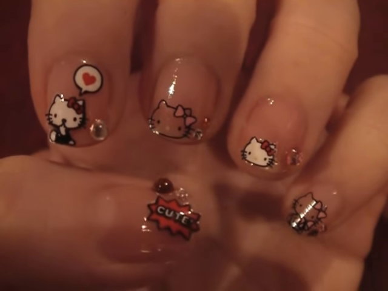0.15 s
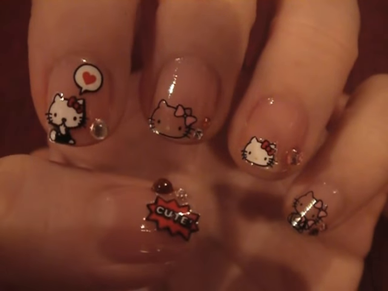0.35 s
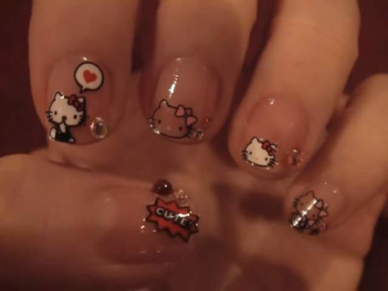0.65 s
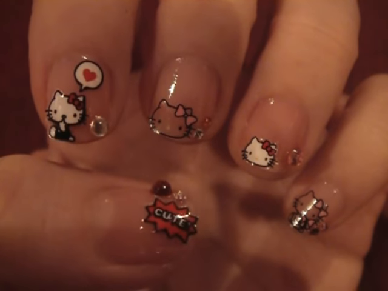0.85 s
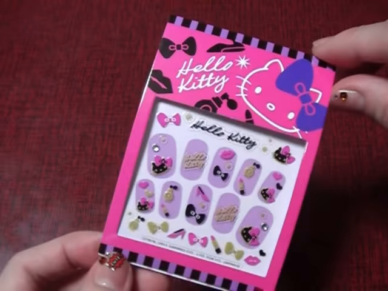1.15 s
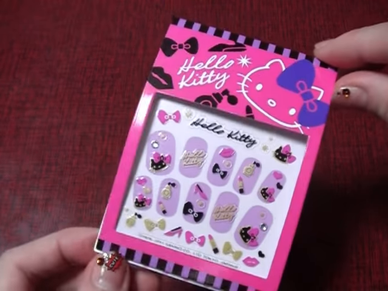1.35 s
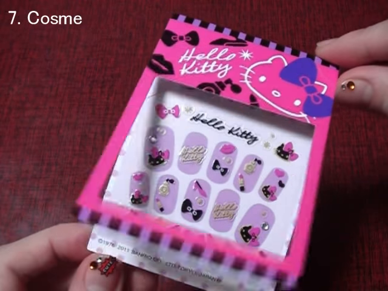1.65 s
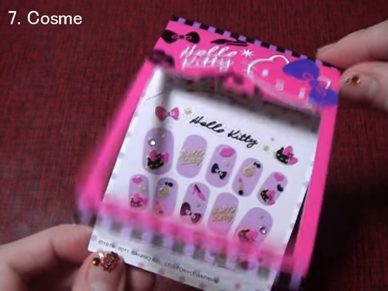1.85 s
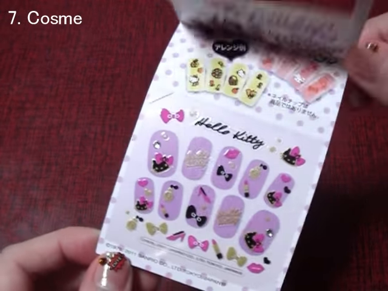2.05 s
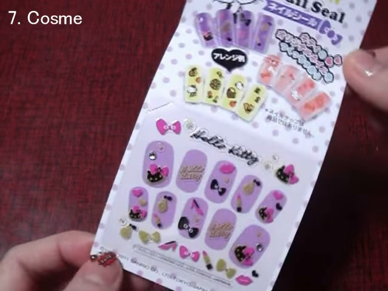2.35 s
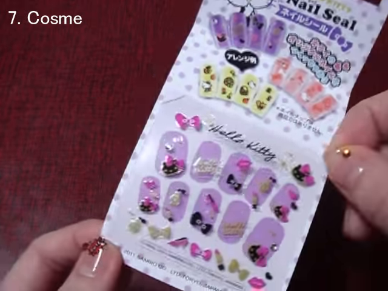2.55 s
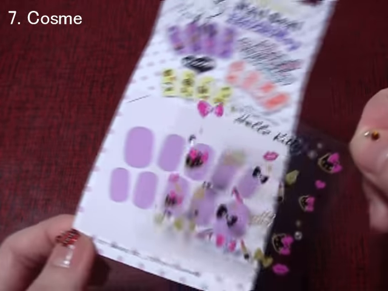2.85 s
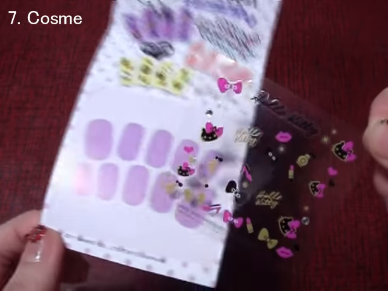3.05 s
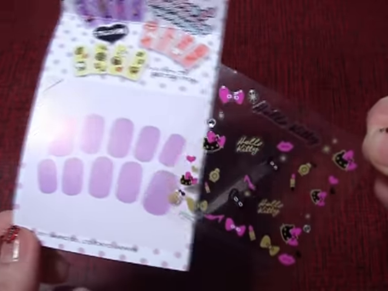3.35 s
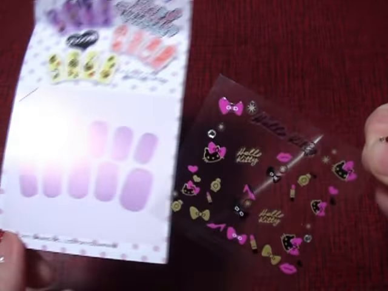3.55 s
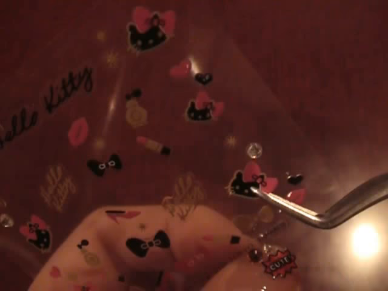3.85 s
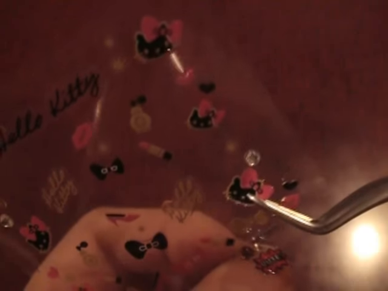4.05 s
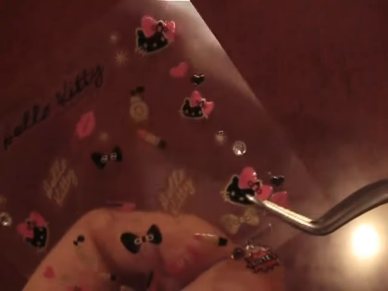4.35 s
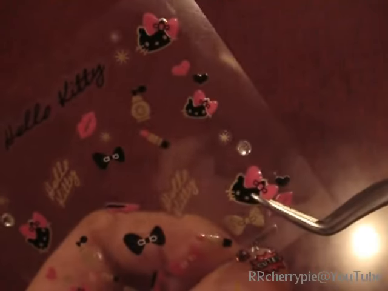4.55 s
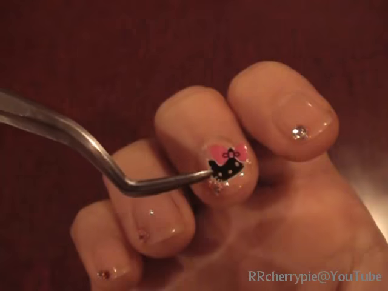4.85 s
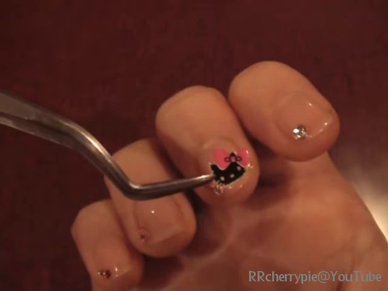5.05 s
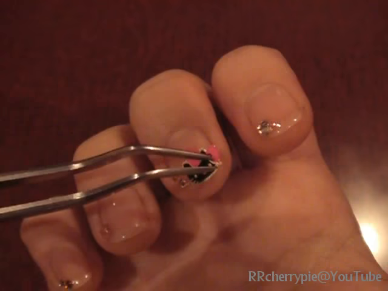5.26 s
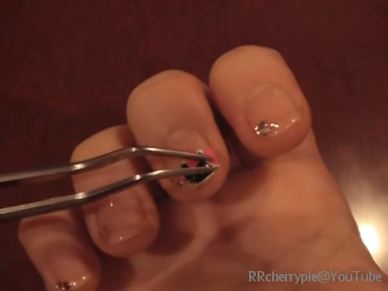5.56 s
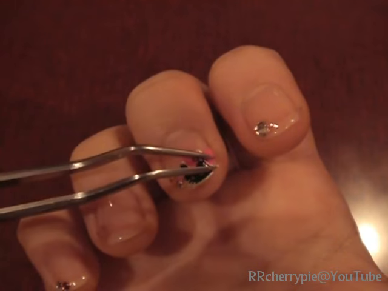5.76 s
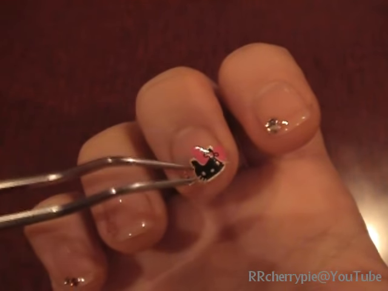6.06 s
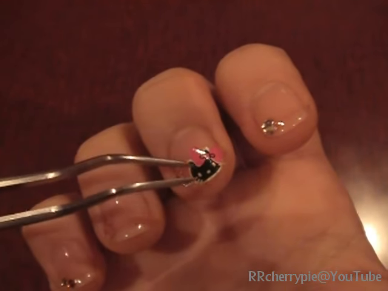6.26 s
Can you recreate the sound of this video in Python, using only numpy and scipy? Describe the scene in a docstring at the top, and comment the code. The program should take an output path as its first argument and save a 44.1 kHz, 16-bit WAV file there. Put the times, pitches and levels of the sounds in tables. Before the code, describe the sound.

A quiet small room, heard very close: soft hiss, a thin steady mid-pitched whine and a faint fluttering hum until a tiny dropout at 1.14 s. A slight motor whirr then runs until about 2.55 s. A small tick at 1.25 s; at 1.63 s a short bright scrape of a card flap, with crisp ticks and a soft knock through 1.76 s. After another dropout, a sharp tick at 2.78 s begins the pull of a plastic sheet; it slides with a crackly, hissy rustle around 3.0 s, then lighter rubs and brushes at 3.3 to 3.7 s. A faint tick at 3.78 s, a gap, quiet hum. Two ticks at 4.39 and 4.43 s lead straight into a very loud, dry, springy plastic snap at 4.44 s, dying quickly in the room. Low soft handling rumble near 4.9 to 5.2 s, faint brushes at 5.04 and 5.6 s, then only room noise and whine to the end at about 6.4 s.

```python
"""A quiet room, close to a small camera: a card packet is opened and a plastic sticker sheet slides out.
Stick-slip friction excites the resonances of card and film; small buckles crack and ring as ticks.
The taut sheet slips off a tweezer tip: its modes ring with a burst of cracks, and the room answers.
Sine whine, filtered-noise whirr and hum, and room noise lie beneath; five brief gaps are nearly silent."""
import sys
import numpy as np
from scipy import signal
from scipy.fft import rfft, irfft
from scipy.io import wavfile
from scipy.ndimage import uniform_filter1d

SR = 44100
rng = np.random.default_rng(int(sys.argv[2]) if len(sys.argv) > 2 else 0)


def wav_out(sig):
    """Save sig, one row per channel (or a flat mono array), as 16-bit PCM at SR to the path in sys.argv[1]."""
    wavfile.write(sys.argv[1], SR, np.round(np.clip(np.atleast_2d(sig).T, -1, 1) * 32767).astype(np.int16))


N = 283122
TIME = np.arange(N) / SR

# resonances of the film sliding over card: centre_hz, width_hz, gain_db
SLIDE_MODES = [(590, 160, 5), (870, 340, 10), (1270, 140, 9.4), (1620, 130, 7.3), (2320, 83, 2),
               (2700, 150, 4.5), (3470, 580, 6.2), (4700, 170, 6), (5420, 570, 3.9), (7400, 1400, 1),
               (7900, 560, 1.4), (9300, 930, 0.94)]


def from_db(db):
    """Amplitude gain is ten to the power of decibels over twenty."""
    return 10 ** (np.asarray(db) / 20)


def rms_one(x):
    """Division by the root mean square gives unit power."""
    return x / np.sqrt(np.mean(x ** 2) + 1e-20)


def at_hz(points, hz, axis=1):
    """Spectral interpolation: one table column is read on a log-frequency axis."""
    table = np.array(points)
    return np.interp(np.log(hz + 1e-9), np.log(table[:, 0]), table[:, axis])


def band(x, low_hz, high_hz, order=2):
    """A causal Butterworth band-pass, maximally flat between its edges."""
    edges_hz = [low_hz, min(high_hz, SR * .45)]
    sections = signal.butter(order, edges_hz, "band", fs=SR, output="sos")
    return signal.sosfilt(sections, x + 1e-18)


def clicks(rows):
    """Impulsive excitation: one single-sample impulse for each row of start_s, level_db."""
    out = np.zeros(N)
    for start_s, level_db in rows:
        out[round(start_s * SR)] += from_db(level_db)
    return out


def drift(per_s):
    """A slow random wander: straight lines join normal draws of unit spread."""
    steps = rng.standard_normal(4000)
    return np.interp(TIME * per_s, np.arange(len(steps)), steps)


def swell(start_s, attack_s, hold_s, release_s):
    """A hand movement: strength rises to start_s, holds, then falls; slopes are in seconds per 20 dB."""
    early = np.maximum(start_s - TIME, 0) / attack_s
    late = np.maximum(TIME - start_s - hold_s, 0) / release_s
    return from_db(-20 * np.minimum(early + late, 10))


def ring(x, hz, t60_s):
    """Damped oscillation: a unit impulse starts a decaying sine of initial height 1."""
    radius = 1000 ** (-1 / (t60_s * SR))
    angle = 2 * np.pi * hz / SR
    poles = [1, -2 * radius * np.cos(angle), radius * radius]
    return signal.lfilter([0, np.sin(angle)], poles, x + 1e-18)


def strike(x, modes):
    """Modal superposition: all modes of a body ring together, neighbours in opposite senses."""
    out = 0
    for k, (hz, gain_db, t60_s) in enumerate(modes):
        out = out + (-1) ** k * from_db(gain_db) * ring(x, hz, t60_s)
    return out


def resonate(x, modes):
    """Forced resonance: parallel two-pole filters of unit peak, each scaled by its own gain."""
    out = 0
    for k, (hz, width_hz, gain_db) in enumerate(modes):
        radius = np.exp(-np.pi * width_hz / SR)
        poles = [1, -2 * radius * np.cos(2 * np.pi * hz / SR), radius * radius]
        unit_peak = (1 - radius * radius) / 2
        out = out + (-1) ** k * from_db(gain_db) * unit_peak * signal.lfilter([1, 0, -1], poles, x)
    return out


def air():
    """Diffuse-field noise, partly alike at both microphones, with the rumble of shifting hands."""
    # noise spectrum: hz, shape_db
    floor_shape = [(20, -10.5), (60, -0.5), (130, -1.5), (340, -3), (440, 0), (520, -5), (760, -4.5),
                   (900, 0), (1150, -8), (2000, -11), (5000, -15.5), (10500, -22), (12000, -28),
                   (12900, -53.5)]
    # left-right likeness of the noise: hz, correlation
    likeness = [(50, 0.37), (130, 0.18), (300, 0.15), (700, 0.22), (1500, 0.083), (4000, 0.11),
                (12000, 0.057)]
    # hands shifting near the camera: start_s, hold_s, level_db
    handling = [(1.25, 1.0, -76.5), (2.63, 0.3, -70), (4.89, .32, -64)]
    hz = np.arange(N // 2 + 1) * SR / N
    alike = np.clip(at_hz(likeness, hz), 0, 1)
    mid, side = rfft(rng.standard_normal((2, N))) * from_db(at_hz(floor_shape, hz))
    spectra = np.sqrt(1 + alike) * mid + np.sqrt(1 - alike) * side * [[1], [-1]]
    hiss = from_db(-61.0) * rms_one(irfft(spectra, N))
    moving = 0
    for start_s, hold_s, level_db in handling:
        moving = moving + from_db(level_db) * swell(start_s, .13, hold_s, 0.501)
    lumps = from_db(3.0 * drift(25))  # uneven rumble
    return hiss + moving * rms_one(lumps * band(rng.standard_normal(N), 105, 260))


def whine():
    """Additive synthesis: steady sines of random phase form the camera whine."""
    # camera whine: line_hz, level_db (rms)
    lines = [(120, -84.5), (420, -80), (603.5, -78.5), (840.5, -66), (1681, -86), (4237, -89.5),
             (10088, -96)]
    out = 0
    for line_hz, level_db in lines:
        sine = np.sin(2 * np.pi * (line_hz * TIME + rng.random()))
        out = out + np.sqrt(2) * from_db(level_db) * sine
    return out


def whirr():
    """Resonant filtering: white noise through narrow resonances gives a faint motor whirr."""
    # motor whirr resonances: centre_hz, width_hz, gain_db
    motor_modes = [(1965, 89, 0), (2270, 40, -4), (2850, 114, -1.5), (3900, 78, -7), (4230, 110, -7.5),
                   (5200, 85, -7.5), (5940, 110, -6)]
    # time during which the whirr sounds: start_s, end_s
    start_s, end_s = (1.15, 2.55)
    running = (TIME > start_s) & (TIME < end_s)
    return from_db(-66.5) * running * rms_one(resonate(rng.standard_normal(N), motor_modes))


def flutter():
    """Amplitude modulation: a narrow band of noise throbs 30 times a second."""
    # stretches of fluttering hum: start_s, end_s, level_db
    stretches = [(0, 1.141, -71), (3.837, 4.778, -77)]
    level = sum(from_db(db) * ((TIME >= start_s) & (TIME < end_s)) for start_s, end_s, db in stretches)
    throb = (1 + np.sin(2 * np.pi * 30 * TIME)) ** 2
    return level * rms_one(throb * band(rng.standard_normal(N), 410, 475))


def background():
    """Linear superposition of room noise, whine, whirr and fluttering hum."""
    return air() + whine() + whirr() + flutter()


def room(x):
    """Reverberation: diffuse reflections decay exponentially in each octave, the bass lasting longest."""
    # the room's answer: hz, level_db, t60_s
    room_decay = [(120, -5.5, .28), (350, -5, 0.22), (902.4, -8.5, 0.07), (2798, -18, .23),
                  (6123, -22.5, .2), (12170, -25, 0.21)]
    t = TIME[:SR // 2]
    response = 0
    edges_hz = 70 * 2. ** np.arange(9)
    for low_hz, high_hz in zip(edges_hz, edges_hz[1:]):
        hz = np.sqrt(low_hz * high_hz)
        mid, side = band(rng.standard_normal((2, len(t))), low_hz, high_hz)
        side = side * min(0.32 + hz / 12000, 1)  # short waves differ more between the microphones
        decay = 1000 ** (-t / at_hz(room_decay, hz, axis=2))
        decay = decay * (t > .004)  # no reflection before 4 ms
        gain = from_db(at_hz(room_decay, hz)) / np.linalg.norm(decay)
        response = response + gain * decay * np.array([mid + side, mid - side])
    return signal.fftconvolve(x[None], response, axes=1)[:, :N]


def place(x, axis, lag_s):
    """Stereo localisation: two microphones hear a source with different colour and a tiny lag."""
    # how much louder the right microphone is: hz, noise_db, handwork_db, snap_db
    right_excess = [(98.5, 2.5, -0.5, 6.5), (639.6, 4, 2, 2.5), (1300, 1, 2, -0.5), (3477, .2, -1, -0.8),
                    (7490, -0.5, 5, 0), (12394, 1, 4, 2.5)]
    hz = np.arange(N // 2 + 1) * SR / N
    # each side takes half of the level difference and half of the lag
    tilt = from_db(at_hz(right_excess, hz, axis=axis) / 2) * np.exp(1j * np.pi * hz * lag_s)
    return irfft(rfft(x) * np.array([1 / tilt, tilt]), N)


def slips(per_s, spread_db, smooth):
    """Stick-slip friction: random tiny slips of uneven size over a smooth hiss."""
    sizes = from_db(spread_db * np.minimum(rng.exponential(1, N), 4))
    signed = sizes * rng.choice([-1, 1], N)
    happens = rng.random(N) < per_s / SR
    return rms_one(signed * happens) + smooth * rng.standard_normal(N)


def brushes():
    """Light friction: Gaussian swells of slips on film, for brushes of fingers and tweezers."""
    # light brushes: centre_s, length_s, level_db
    brush_rows = [(0.711, 0.028, -62), (1.404, .08, -71), (1.526, 0.024, -64), (2.508, 0.038, -67.5),
                  (3.316, 0.014, -50), (3.505, 0.014, -48), (3.555, .02, -57.5), (3.694, 0.01, -60),
                  (4.602, 0.022, -64.5), (5.036, .02, -69.5), (5.598, 0.028, -65.5)]
    strength = 0
    for centre_s, length_s, level_db in brush_rows:
        strength = strength + from_db(level_db) * np.exp(-2 * ((TIME - centre_s) / length_s) ** 2)
    friction = slips(per_s=1500, spread_db=7.0, smooth=1.0)
    bright = from_db(4.0) * band(friction, 5000, 7900)
    return strength * rms_one(resonate(friction, SLIDE_MODES) + bright)


def rub(grip, modes, friction, broad_db, low_hz):
    """Friction-driven resonance: pressure feeds the low resonances, speed the hiss above them."""
    # strokes on flap and sheet: grip, start_s (full strength), attack_s (per 20 dB), hold_s,
    # release_s (per 20 dB), body_db, hiss_db
    strokes = [("flap", 1.630, 0.03, 0.013, 0.02, -50, -46), ("pull", 2.74, .125, 0.038, 0.02, -53.5, -47),
               ("pull", 2.835, .11, 0.043, 0.035, -60, -53.5),
               ("slide", 3.012, 0.064, 0.077, .15, -48.5, -47),
               ("settle", 3.25, 0.067, 0.0045, 0.06, -56.5, -57.5),
               ("settle", 3.312, 0.064, 0.0062, 0.031, -51.5, -52),
               ("settle", 3.39, 0.19, 0.071, .06, -62.5, -64), ("settle", 3.5, 0.048, .01, .09, -57.5, -54),
               ("settle", 3.4, 0.087, .09, .05, -76, -69)]
    body, hiss = 0, 0
    for name, start_s, attack_s, hold_s, release_s, body_db, hiss_db in strokes:
        if name == grip:
            stroke = swell(start_s, attack_s, hold_s, release_s)
            body = body + from_db(body_db) * stroke
            hiss = hiss + from_db(hiss_db) * stroke
    # as the contact point travels, each resonance is fed now more, now less
    sound = 0
    for k, mode in enumerate(modes):
        fed = friction * from_db(3.5 * drift(60))
        sound = sound + (-1) ** k * resonate(fed, [mode])
    # the many weak modes between them swell and fade in patches too
    edges_hz = np.geomspace(low_hz, 11200, 15)
    patches = 0
    for k, (low, high) in enumerate(zip(edges_hz, edges_hz[1:])):
        fed = friction * from_db(3 * drift(80))
        patches = patches + (-1) ** k * band(fed, low, high, order=1)
    sound = sound + from_db(broad_db) * patches
    lower = rms_one(band(sound, low_hz, 3000, order=3))
    upper = rms_one(band(sound, 3000, 11000, order=4))
    return body * lower + hiss * upper


def packet():
    """Friction and impact: the flap scrapes open, knocks sound, the sheet is pulled, slid and laid down."""
    # resonances of card and film in each grip: centre_hz, width_hz, gain_db
    flap_modes, pull_modes = [(1660, 52, -2.5), (2550, 240, -27), (4600, 110, 9), (7050, 190, 3),
                              (7800, 250, 1), (8850, 170, 7), (9860, 410, -6), (11100, 230, -5)], [(1470, 140, 8), (2260, 77, -6), (2670, 34, 1),
                                                  (3800, 140, -8), (5000, 330, 5.5), (6850, 120, -8),
                                                  (7400, 180, 6), (9750, 140, -8)]
    settle_modes = [(924, 58, 16), (1270, 340, 2), (1610, 170, -2), (2280, 120, -1), (2730, 180, -5),
                    (3400, 190, -0.5), (4560, 390, 7), (5680, 270, 4), (8100, 190, -12), (10000, 110, -18)]
    # soft knocks of fingers on card and film: start_s, level_db
    knocks = [(1.2482, -48), (1.7100, -38), (1.7625, -26.5), (2.7900, -38.5), (4.3865, -41)]
    # low modes woken by the knocks: hz, gain_db, t60_s
    packet_modes = [(210, -17.5, 0.047), (364.9, -17, 0.017), (570, -11.5, 0.042), (776, -5.5, 0.013),
                    (1180, -20, 0.066), (1780, -23, 0.024)]
    friction = slips(per_s=1500, spread_db=4, smooth=.55)
    flap = rub("flap", flap_modes, friction, broad_db=-17.5, low_hz=1200)
    pull = rub("pull", pull_modes, friction, broad_db=-1, low_hz=784)
    slide = rub("slide", SLIDE_MODES, friction, broad_db=-3.0, low_hz=538)
    settle = rub("settle", settle_modes, friction, broad_db=-0.5, low_hz=715)
    return flap + pull + slide + settle + strike(clicks(knocks), packet_modes)


def crack(x, t60_s, low_hz, high_hz):
    """Fracture noise: each impulse releases random-signed samples that decay within milliseconds."""
    envelope = signal.lfilter([1], [1, -1000 ** (-1 / (t60_s * SR))], x + 1e-18)
    return band(envelope * rng.choice([-1, 1], N), low_hz, high_hz)


def ticks():
    """Buckling: a flipped patch cracks and rings, the sheet flexes lower; low patches ring longer."""
    # ticks of card and film: start_s, crack_db, ring_hz, ring_db, flex_db
    tick_rows = [(1.249, -42, 4600, -48, -41), (1.6275, -40, 8800, -39, -57), (1.643, -42, 8700, -42, -53),
                 (1.7095, -28, 8600, -32, -50), (1.7123, -36, 4620, -36, -37),
                 (1.7378, -36.5, 8700, -29, -52), (1.7636, -37.5, 4700, -41.5, -39),
                 (2.7753, -26.5, 4610, -25, -47), (2.8411, -33, 8400, -43, -46),
                 (2.919, -44, 8400, -48, -52), (2.9449, -39.5, 7300, -50, -59), (2.97, -42, 8340, -40, -48),
                 (2.9824, -40, 8700, -33, -53), (3.0508, -42, 4800, -45, -40),
                 (3.7836, -36.5, 4500, -46, -54), (4.3853, -31, 4740, -39, -51),
                 (4.4257, -32, 4560, -44, -52)]
    ring_cycles = 58  # cycles in a 60 dB decay, the same for every patch
    flex_ratio, flex_t60_s = .32, .0074  # flexing pitch as a share of the patch pitch
    out = 0
    for start_s, crack_db, ring_hz, ring_db, flex_db in tick_rows:
        low_hz, high_hz = .28 * ring_hz, min(1.9 * ring_hz, 10300)
        out = out + crack(clicks([(start_s, crack_db)]), 0.011, low_hz, high_hz)
        out = out + ring(clicks([(start_s, ring_db)]), ring_hz, ring_cycles / ring_hz)
        out = out + ring(clicks([(start_s, flex_db)]), flex_ratio * ring_hz, flex_t60_s)
    return out


def snap():
    """Release of elastic energy: the freed sheet rings and cracks; returns direct and scattered sound."""
    # the sheet slips off the tweezer tip, springs back and flaps: start_s, push_db, crack_db
    release_rows = [(4.44, -27, -25.5), (4.441, -12, -19.5), (4.443, 4, -7.5), (4.446, -13, -27.5),
                    (4.4478, -18, -36)]
    # modes of the taut sheet: hz, gain_db, t60_s
    sheet_modes = [(175, -32.5, 0.09), (266.7, -30, 0.036), (455, -39.5, 0.039), (630, -34, 0.022),
                   (780, -32, 0.046), (880, -37, 0.016), (980, -25.5, 0.0064), (1140, -32, 0.054),
                   (1800, -16.5, 0.012), (2230, -19.5, .021), (2614, -10, 0.017), (2960, -20.5, 0.031),
                   (3290, -14.5, .016), (3820, -21, 0.029), (4120, -17.5, .018), (4840, -20.5, .024),
                   (5580, -12.5, .01), (6740, -14, .009), (7870, -9.5, 0.0069), (9500, -12.5, 0.0055)]
    pushes = clicks([(start_s, push_db) for start_s, push_db, _ in release_rows])
    cracks = clicks([(start_s, crack_db) for start_s, _, crack_db in release_rows])
    direct = strike(pushes, sheet_modes) + crack(cracks, t60_s=0.008, low_hz=2524, high_hz=12500)
    # a small sheet radiates little bass
    direct = signal.sosfilt(signal.butter(3, 115, "high", fs=SR, output="sos"), direct)
    # one band-limited echo from a nearby surface, 14.5 ms late
    echo = np.interp(TIME - .0145, TIME, band(direct, 2200, 9000))
    # summed over all directions, the gaps between the modes fill in
    scattered = from_db(-7) * direct + from_db(13.0) * band(pushes, 1500, 8000, order=1)
    return direct + from_db(-24) * echo, scattered


def scene():
    """Superposition of direct and reverberant fields: handwork slightly right, snap almost central."""
    noise = place(background(), axis=1, lag_s=0)
    handwork = packet() + brushes() + ticks()
    quiet = place(handwork + from_db(-3.0) * room(handwork), axis=2, lag_s=.000008)
    direct, scattered = snap()
    loud = place(direct + room(scattered), axis=3, lag_s=.00001)
    return noise + quiet + loud


def record(dry):
    """Gating, clipping and low-pass filtering: gaps drop by 40 dB, peaks stop at full scale, the top is cut."""
    # nearly silent gaps: start_s, end_s
    gaps = [(1.1395, 1.156), (2.540, 2.560), (3.808, 3.838), (4.775, 4.800), (5.275, 5.281)]
    live = np.ones(N)
    for start_s, end_s in gaps:
        live[(TIME > start_s) & (TIME < end_s)] = .01
    gate = uniform_filter1d(live, size=64)  # softens the gap edges
    sound = np.clip(dry * gate, -1, 1)
    # the stopband, 60 dB down, begins at 14200 Hz
    return signal.sosfilt(signal.cheby2(16, 60, 14200, fs=SR, output="sos"), sound)


dry = scene()
out = record(dry)
wav_out(out)
```